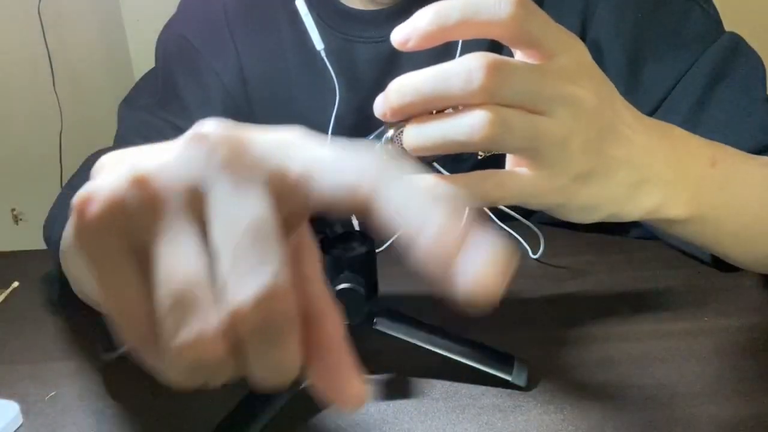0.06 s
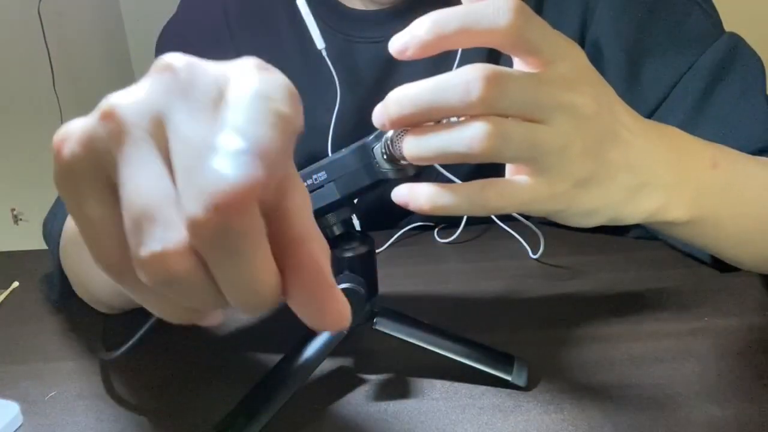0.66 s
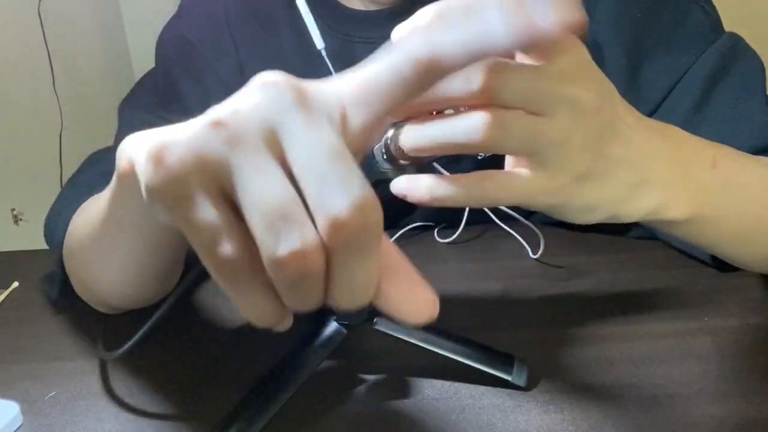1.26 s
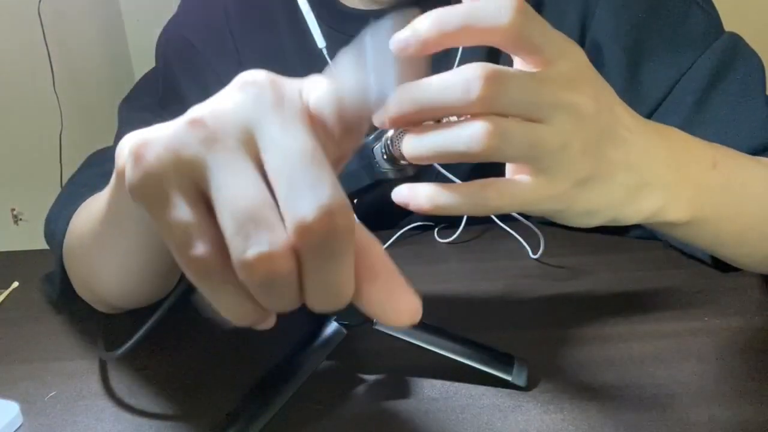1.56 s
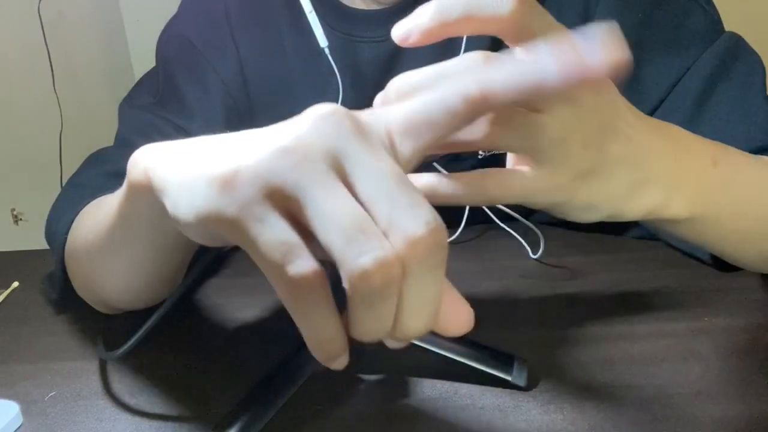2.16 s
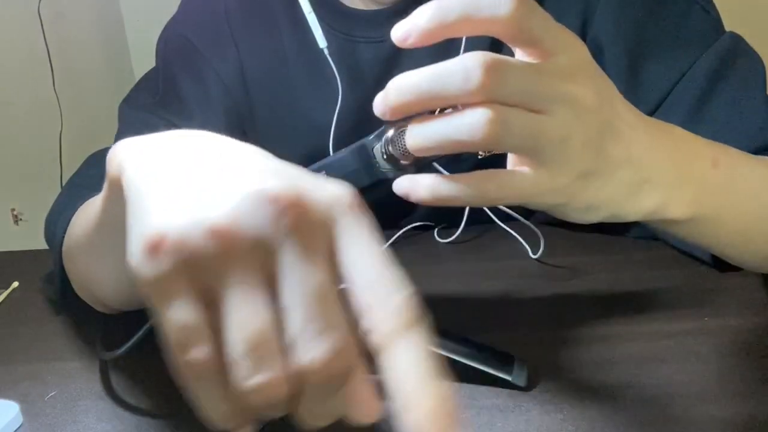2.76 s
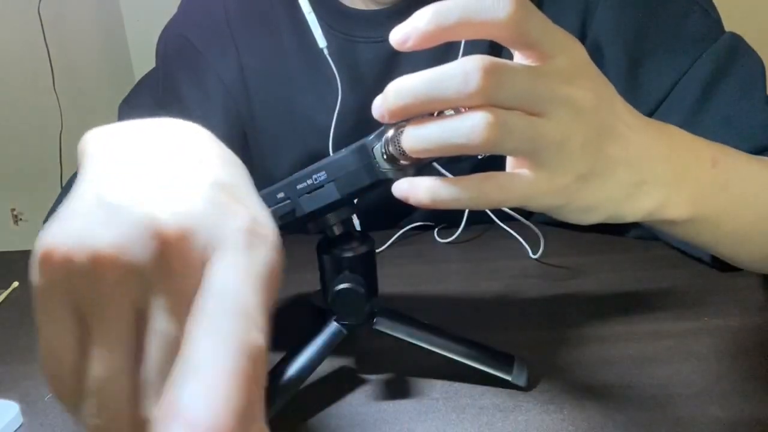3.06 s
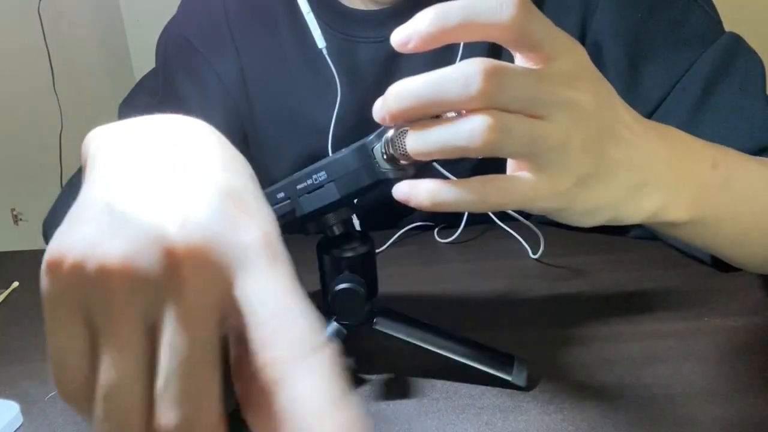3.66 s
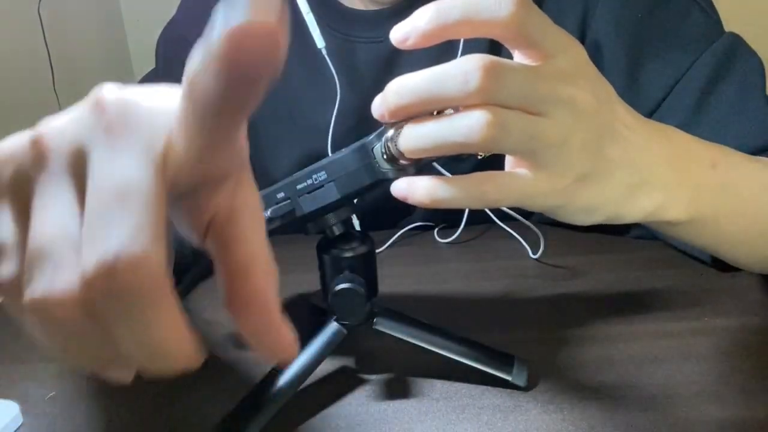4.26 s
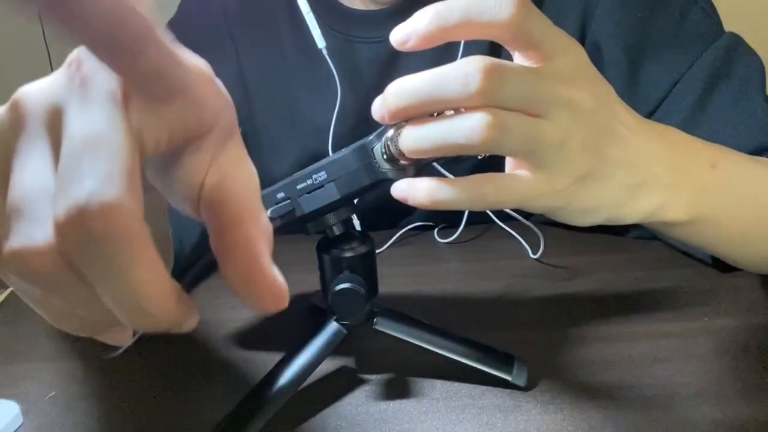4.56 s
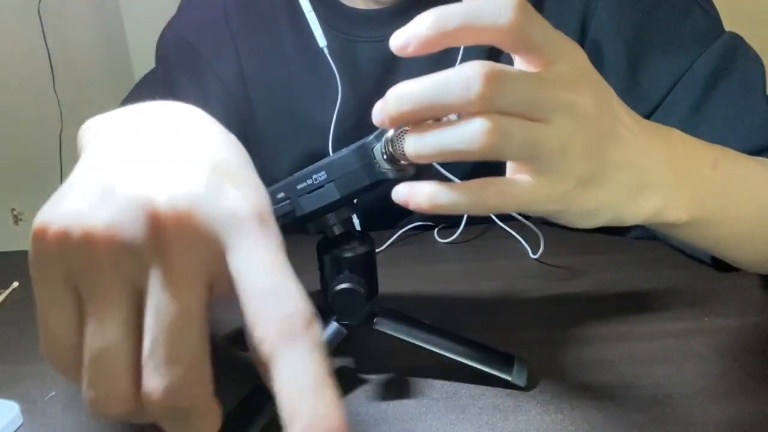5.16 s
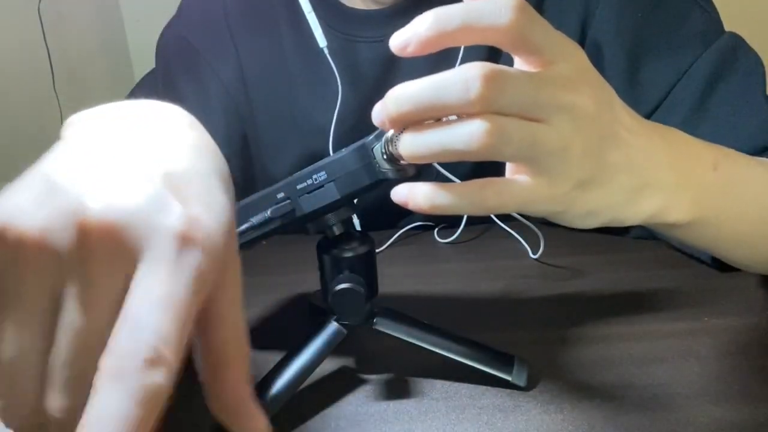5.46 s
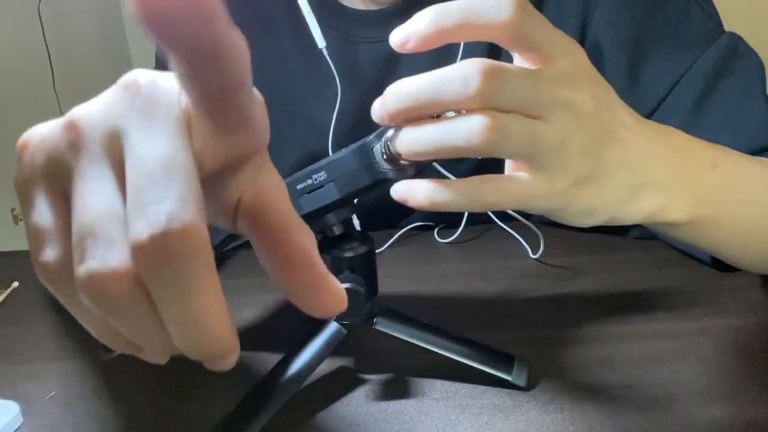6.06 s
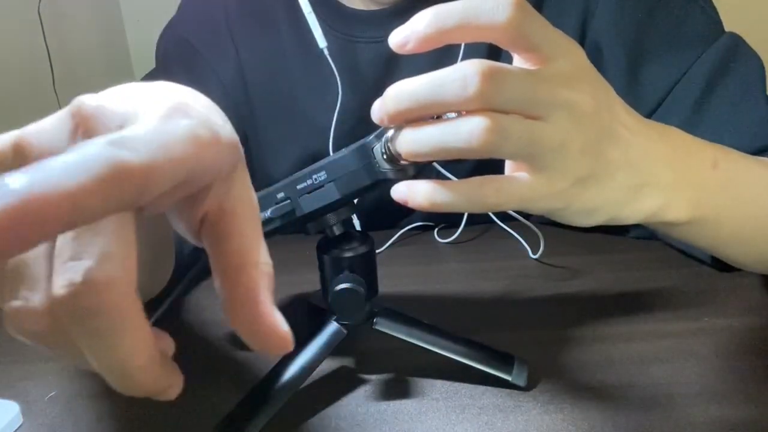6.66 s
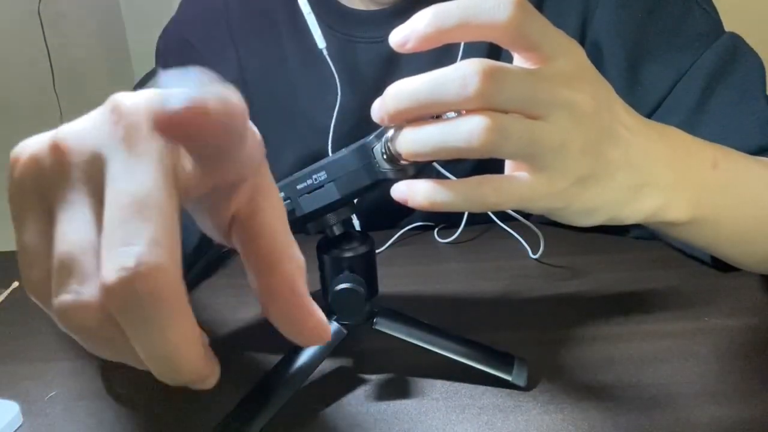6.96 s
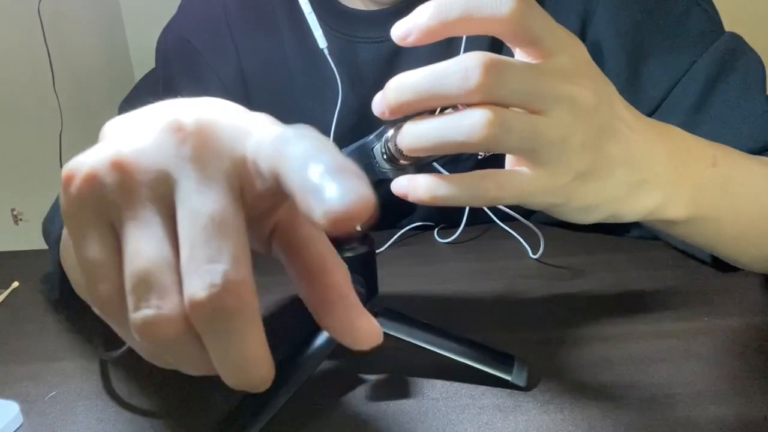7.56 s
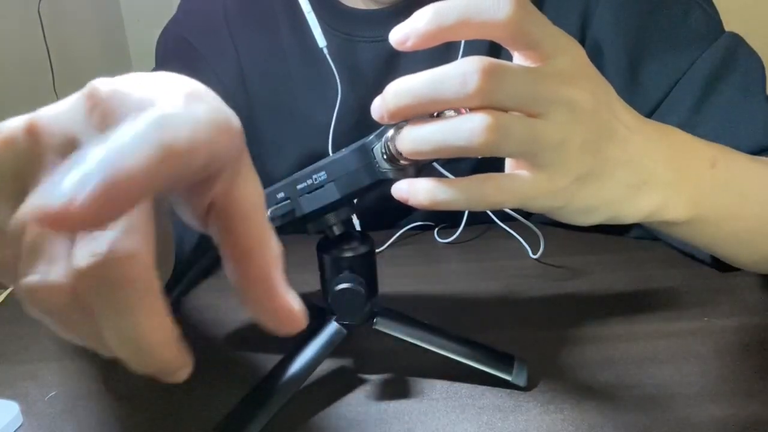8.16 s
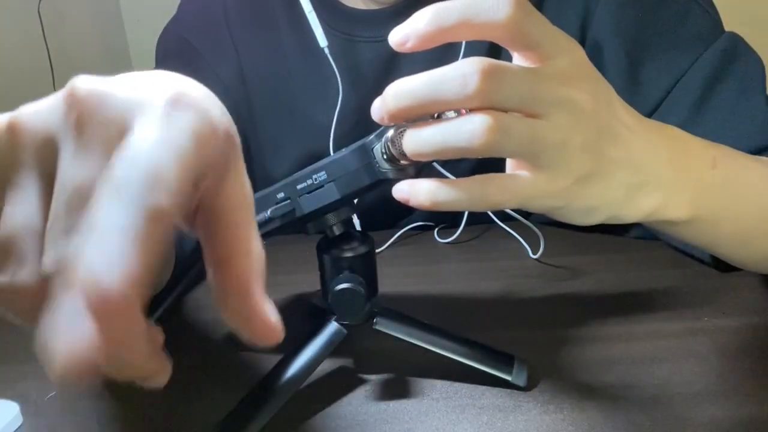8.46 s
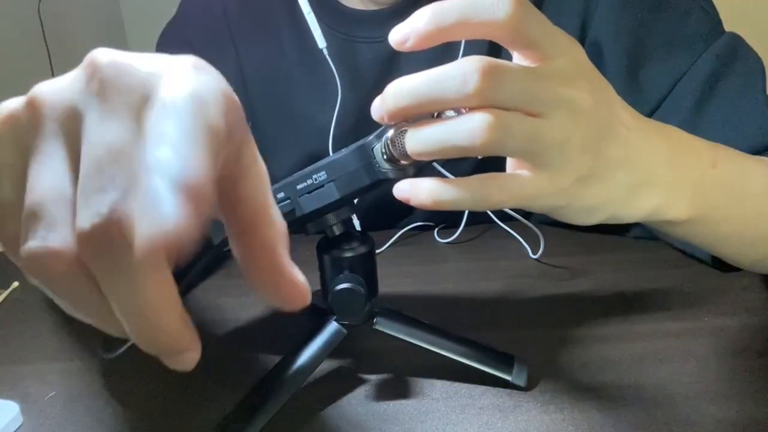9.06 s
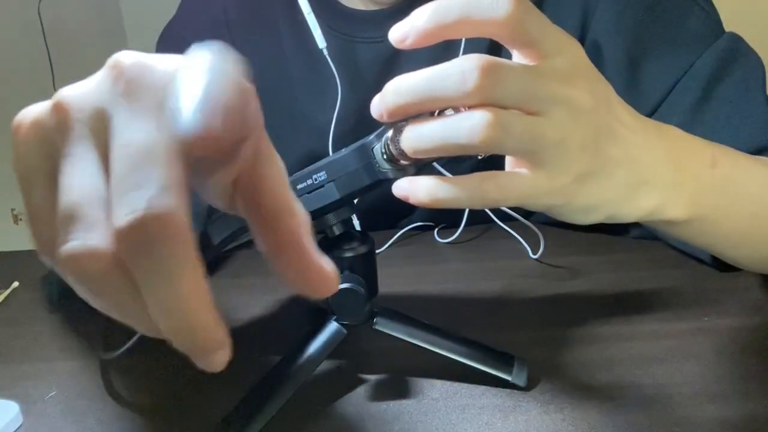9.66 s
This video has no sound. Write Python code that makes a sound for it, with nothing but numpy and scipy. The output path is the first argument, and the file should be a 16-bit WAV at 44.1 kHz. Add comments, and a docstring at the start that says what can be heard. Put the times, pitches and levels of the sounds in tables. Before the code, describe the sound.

Close, rapid scratching and flicking on a microphone's wire mesh, mostly on the right, with deep bumps in a quiet room.

```python
"""Fingertips and nails rub and flick over the mesh grille of a stereo microphone's right capsule.
Each stroke lands, slides and lifts: a stream of tiny slips rings the grille, over soft thuds of the
shoved capsule. Now and then a nail catches and lets go, or the fingers stop briefly.
The left capsule hears mostly the ringing housing, with a low thud and faint nail hiss.
The microphone sways on its stand, the room is quiet, and the hardest shove overloads the input."""
import sys
import numpy as np
from scipy import signal
from scipy.fft import rfft, irfft, next_fast_len
from scipy.io import wavfile
from scipy.ndimage import uniform_filter1d, map_coordinates

SR = 44100
rng = np.random.default_rng(int(sys.argv[2]) if len(sys.argv) > 2 else 0)


def unload_wav(signal):
    """Save mono or channel-first audio to the path in sys.argv[1] as 16-bit WAV at rate SR, clipped to [-1, 1]."""
    wavfile.write(
        sys.argv[1],
        SR,
        np.round(np.clip(np.atleast_2d(signal).T, -1, 1) * 32767).astype(np.int16),
    )


N = 432180


def amp(db):
    """Decibels to gain."""
    return 10 ** (np.asarray(db) / 20)


def unit(x):
    """Scale to rms 1."""
    return x / np.sqrt(np.mean(x ** 2) + 1e-20)


def gain(spectrum, hz):
    """Gain of (Hz, dB) points joined on a log axis."""
    points_hz, db = np.transpose(spectrum)
    return amp(np.interp(np.log(hz + 1), np.log(points_hz), db))


def wobble(rate_hz):
    """Smooth random curve, rate_hz knots a second."""
    knots = rng.standard_normal(int(N * rate_hz / SR) + 4)
    return map_coordinates(knots, [np.arange(N) * rate_hz / SR])


def filtered(x, response):
    """Apply a frequency response."""
    size = next_fast_len(N + SR // 2)
    return irfft(rfft(x, size) * response(np.fft.rfftfreq(size, 1 / SR)), size)[..., :N]


def boosted(x, boost_db, hz, width_hz):
    """Lift or damp one resonance."""
    band = filtered(x, lambda f: 1j * f * width_hz / (hz * hz - f * f + 1j * f * width_hz))
    return x + (amp(boost_db) - 1) * band


def noise(spectrum):
    """Coloured noise, rms 1."""
    return unit(filtered(rng.standard_normal(N), lambda hz: gain(spectrum, hz)))


def smoothed(envelope, span_s):
    """Moving average of a positive envelope."""
    return np.abs(uniform_filter1d(envelope, int(span_s * SR)))


def evened(x, span_s):
    """Flatten swells longer than span_s; rms 1."""
    return unit(x / np.sqrt(smoothed(x ** 2, span_s) + 0.067))


def resonator(modes, size=8192):
    """Impulse response of freely ringing modes, energy 1."""
    t = np.arange(size) / SR
    response = sum((-1) ** k * amp(db) * width * np.exp(-np.pi * width * t) * np.sin(2 * np.pi * hz * t)
                   for k, (hz, width, db) in enumerate(modes))
    response *= 1 - np.exp(-t / 0.00089)
    return response / np.linalg.norm(response)


def body(modes, spectrum, size=8192):
    """Minimum-phase impulse response of resonances on a broad spectrum, energy 1."""
    hz = np.fft.rfftfreq(size, 1 / SR)
    power = gain(spectrum, hz) ** 2
    for mode_hz, width_hz, db in modes:
        peak = amp(db) * hz * width_hz / (mode_hz ** 2 - hz ** 2 + 1j * hz * width_hz)
        skirt_loss = 1 + (2 * np.log((hz + 1) / mode_hz)) ** 4
        power += np.abs(peak) ** 2 / skirt_loss
    cepstrum = irfft(np.log(power + 1e-12) / 2)
    cepstrum[1:size // 2] *= 2
    cepstrum[size // 2 + 1:] = 0
    response = irfft(np.exp(rfft(cepstrum)))
    return response / np.linalg.norm(response)


def ring(x, response):
    """Drive an impulse response with x."""
    return signal.fftconvolve(x, response)[:N]


# Room air and capsule hiss spectra: (frequency [Hz], density [dB])
AIR_SPECTRUM = [(25, 4), (60, 1.5), (110, -3.5), (220, -0.5), (410, -7), (650, -22.5), (790, -16),
                (950, -25.5), (2000, -31.5), (6000, -44)]
HISS_SPECTRUM = [(25, 9.5), (100, 6.5), (400, 19.5), (1000, 9), (2000, 4.5), (6000, 4), (15500, 2)]
def room(air_db=-67, hiss_db=-77):
    """Faint room air common to both capsules, plus the hiss of each."""
    air = amp(air_db) * noise(AIR_SPECTRUM)
    return air + amp(hiss_db) * np.array([noise(HISS_SPECTRUM), noise(HISS_SPECTRUM)])


# Sway on the stand: (time [s], relative level [dB])
SWAY_LEVELS = [(0, -31.5), (0.6, -47), (0.9, -49), (1.8, -63), (2.15, -21), (2.5, -41.5), (2.9, -37),
               (3.5, -48), (4.9, -65), (5.35, -26.5), (5.8, -33.5), (6.5, -53.5), (7.9, -73), (8.45, -28),
               (8.8, -27.5), (9, -39), (9.8, -63)]
# Sway rumble spectrum: (frequency [Hz], density [dB])
SWAY_SPECTRUM = [(4, 7), (14, 13), (28, -0.5), (48, -10.5), (110, -39.5), (300, -99)]
def rocking(thud_db, give_s=0.065, settle_s=0.61):
    """The microphone sways slowly; the touched side also gives under each push and settles."""
    sway_db = np.interp(np.arange(N) / SR, *np.transpose(SWAY_LEVELS))
    give = amp(-4.5) * smoothed(amp(thud_db), give_s)
    settle = amp(-10) * smoothed(amp(thud_db), settle_s)
    left = amp(sway_db + 2.5) * evened(noise(SWAY_SPECTRUM), span_s=0.24)
    right = (give + settle + amp(sway_db - 9)) * evened(noise(SWAY_SPECTRUM), span_s=0.17)
    return np.array([left, right])


# Housing resonances: (frequency [Hz], width [Hz], level [dB])
HOUSING_MODES = [(592.7, 15.5, 0), (656, 40, -4), (724, 37, -15), (885, 67, -20.5), (1130, 100, -29),
                 (1480, 61, -19.5), (1534, 65, -24), (1747, 42, -25.5), (2666, 200, -32.5),
                 (4130, 140, -43)]
# Far capsule bounce spectrum: (frequency [Hz], density [dB])
FAR_THUD_SPECTRUM = [(25, -9.5), (45, 3), (70, -4), (105, -10.5), (160, -21), (250, -23), (400, -39),
                     (900, -75)]
def housing(friction, drag, knocks, carry_db, thud_db):
    """Friction and knocks ring the housing; the far capsule bounces with the finger pressure."""
    far_slips = drag * slips(rate_hz=8200, spread_db=5.5)  # these miss the near capsule
    shaking = 0.5 * friction + 0.87 * far_slips + 1.4 * knocks
    ringing = ring(amp(carry_db + 0.5) * shaking, resonator(HOUSING_MODES))
    return ringing + amp(thud_db - 20) * noise(FAR_THUD_SPECTRUM)


def push_pulse(t, push_s, edge_share):
    """One push and swing back, reversing at t = 0; a slow push also lets go slowly."""
    return -np.tanh(t / (edge_share * push_s)) * np.exp(-(t / push_s) ** 2 / 2)


# Finger pad bumps: (time [s], relative level [dB])
PAD_BUMPS = [(0.043, -25), (0.184, -27), (0.991, -37), (1.585, -38), (1.783, -44), (3.272, -37),
             (4.013, -33), (4.428, -42), (4.867, -26), (6.351, -36), (6.502, -49), (6.994, -21),
             (7.391, -14), (7.758, -15.5), (8.216, -19), (8.414, -27)]
def bumps():
    """A soft pad pushes the capsule once and lets it swing back."""
    t = np.arange(-SR // 40, SR // 40) / SR
    pulse = push_pulse(t, push_s=0.0037, edge_share=0.36)
    out = np.zeros(N)
    for time_s, db in PAD_BUMPS:
        out[round(time_s * SR) - SR // 40:][:len(t)] += amp(db + 1) * pulse
    return out


# Near capsule bounce spectrum: (frequency [Hz], density [dB])
THUD_SPECTRUM = [(25, -2), (55, 0.5), (105, -2), (150, -8), (250, -15), (400, -40), (900, -78.5)]
def capsule_thud(level_db, thumps):
    """The shoved capsule bounces on its mount. Returns the thud and the shove (rms 1)."""
    shove = evened(noise(THUD_SPECTRUM), span_s=0.025)
    bounce = amp(level_db - 0.97) * shove + thumps + bumps()
    return boosted(bounce, boost_db=0.5, hz=115, width_hz=16), shove


# Catches, relative levels: (time [s], thump [dB], scrape [dB], tick [dB], knock [dB], push [s])
NAIL_CATCHES = [(0.039, -40, -43.5, -67, -50, 0.0026), (0.341, -40, -55, -63, -38, 0.0031),
                (0.364, -29, -72, -58, -38, 0.0056), (0.406, -42, -70, -64, -52, 0.0042),
                (0.451, -26, -58, -63, -48, 0.0046), (0.501, -20.5, -73, -64, -44, 0.004),
                (0.638, -26.5, -52, -81, -60, 0.0012), (0.72, -39, -36, -57, -35, 0.0029),
                (0.785, -24, -53, -77, -51, 0.0015), (1.993, -8.5, -30, -43, -31, 0.0043),
                (2.027, -23, -33.5, -72, -53, 0.0038), (2.326, -20, -32.5, -46, -42, 0.003),
                (2.344, -24, -52, -66, -48, 0.0019), (2.375, -30, -38.5, -56, -49, 0.0024),
                (2.573, -19.5, -38, -71, -40, 0.002), (2.63, -29.5, -54, -66, -48, 0.0017),
                (3.017, -40, -50, -66, -54, 0.0043), (3.379, -21, -38, -50.5, -35, 0.0056),
                (3.534, -40, -43.5, -66, -38, 0.0034), (3.573, -13, -34, -53, -51, 0.0032),
                (3.745, -36, -36.5, -50, -26, 0.0022), (3.874, -26, -37, -65, -51, 0.0021),
                (3.935, -13, -51, -50.5, -47, 0.0033), (4.197, -19.5, -44.5, -58, -49, 0.0063),
                (4.572, -26, -31.5, -50, -41, 0.0023), (4.642, -25.5, -56, -74, -57, 0.0015),
                (4.825, -19, -42.5, -58, -38, 0.0061), (5.091, -22, -55, -48.5, -35, 0.0028),
                (5.125, -16.5, -62, -50, -34, 0.005), (5.496, -32, -60, -78, -59, 0.0028),
                (5.653, -31.5, -47, -60, -41, 0.0026), (7.031, -11.5, -30.5, -44.5, -24, 0.0016),
                (7.109, -16.5, -41, -50.5, -46, 0.0049), (7.147, -22.5, -33, -57, -33, 0.0016),
                (7.213, -40, -45, -61, -50, 0.0037), (7.361, -28, -52, -52.5, -44, 0.0053),
                (7.71, -16, -34, -49, -24, 0.0057), (7.727, -19.5, -40, -57, -20.5, 0.0019),
                (7.909, -29, -34, -50, -47, 0.0024), (7.947, -40, -42, -61, -50, 0.0046),
                (8.014, -29, -41, -58, -50, 0.019), (8.497, -18.5, -23.5, -36, -30, 0.0031),
                (8.594, -32, -41, -58, -52, 0.003), (8.616, -16, -43, -52, -23.5, 0.0046),
                (8.704, -4.5, -40, -64, -53, 0.0053), (8.9, -16, -29, -42.5, -41, 0.0014),
                (9.062, -26, -48, -64, -53, 0.0019), (9.48, -15, -35.5, -55, -44, 0.0035),
                (9.632, -18.5, -35.5, -61, -48, 0.0036)]
def catches(scrape_t60_s=0.023, tick_t60_s=0.009):
    """A catch pushes the capsule, then snaps back: a sharp slip, a short scrape, a knock on the grille."""
    lead = SR // 20
    t = np.arange(-lead, lead) / SR
    snap = 1.0 * (t == 0)

    def slide(t60_s):
        """Decaying noise after the snap."""
        return (t > 0) * amp(-60 * np.abs(t) / t60_s) * rng.standard_normal(len(t))

    out = np.zeros((4, N + SR))
    for time_s, thump_db, scrape_db, tick_db, knock_db, push_s in NAIL_CATCHES:
        thump = amp(thump_db + 5.5) * push_pulse(t, push_s, edge_share=0.25)
        scrape = amp(scrape_db + 29) * (snap + 0.085 * slide(scrape_t60_s))
        tick = amp(tick_db + 23.5) * (snap + 0.19 * slide(tick_t60_s))
        knock = amp(knock_db + 19.5) * snap
        first = round(time_s * SR)
        out[:, first:first + len(t)] += [thump, scrape, tick, knock]
    return out[:, lead:lead + N]


def slips(rate_hz, spread_db):
    """Tiny slips over the wires at random times and sizes, rms 1."""
    happens = rng.random(N) < rate_hz / SR
    sizes = amp(spread_db * np.clip(rng.standard_normal(N), -2, 2))
    return unit(happens * sizes * rng.choice([-1, 1], N))


def grip(shove, depth, flutter_db=3):
    """Friction bites harder at each shove and flutters with the ridges of the skin."""
    return unit((1 + depth * np.abs(shove)) * amp(flutter_db * wobble(rate_hz=130)))


# Wire resonances: (frequency [Hz], width [Hz], level [dB])
WIRE_MODES = [(4540, 930, -1), (5880, 170, 0)]
def singing_wires(nail_db):
    """A light touch sets the wires singing; pressure damps them, so they grow less than the hiss."""
    drive = amp(0.69 * nail_db - 36 + 3.5 * wobble(rate_hz=12))
    return ring(drive * rng.standard_normal(N), resonator(WIRE_MODES))


def tilted(x, bright_db, pivot_hz=4700):
    """Raise the treble and lower the rasp below the pivot, or the reverse."""
    treble = filtered(x, lambda hz: 1 - 1 / (1 + (hz / pivot_hz) ** 8))
    return amp(-0.35 * bright_db) * (x - treble) + amp(0.94 * bright_db) * treble


# Nail hiss and tick spectra: (frequency [Hz], density [dB])
NAIL_SPECTRUM = [(1200, -25), (2600, 7), (3600, 0.5), (5000, -0.5), (6000, -1.5), (7000, -6.5), (8500, -6),
                 (11000, -13), (15500, -14)]
TICK_SPECTRUM = [(900, -6.5), (2400, 11.5), (6000, -2.5), (15500, -27.5)]
def nail_on_wires(nail_db, waver_db, bright_db, shove, plucks, ticks):
    """The nail hisses over the wires in dense slips, sets them singing and ticks against them."""
    grain = slips(rate_hz=16000, spread_db=0.5) + 0.35 * plucks
    drive = amp(nail_db + waver_db - 1.6) * grain * grip(shove, depth=0.15)
    hiss = ring(drive, body([(5900, 350, -9)], NAIL_SPECTRUM))
    ticking = ring(ticks, body([(3260, 1700, -1)], TICK_SPECTRUM))
    return tilted(hiss, bright_db) + singing_wires(nail_db) + ticking


# Grille resonances: (frequency [Hz], width [Hz], level [dB])
GRILLE_MODES = [(638, 40, 0), (1770, 80, -13)]
# Rubbed mesh spectrum: (frequency [Hz], density [dB])
MESH_SPECTRUM = [(150, -50.5), (250, -0.5), (340, 2), (450, -2), (560, -6.5), (800, -9), (1000, -13),
                 (1400, -19.5), (2000, -24.5), (2550, -37), (3100, -37), (4200, -46.5), (9000, -83)]
def skin_on_mesh(friction, knocks, hollow_db):
    """Dragging skin and knocks ring the grille; the air inside rings with the place of the finger."""
    rasp = ring(friction, body(GRILLE_MODES, MESH_SPECTRUM))
    return boosted(rasp, hollow_db, hz=635, width_hz=130) + ring(knocks, resonator(GRILLE_MODES))


def finger_roll(rasp, depth_db=0.5, rate_hz=11):
    """The rasp shifts in colour as the finger rolls over the mesh."""
    rasp = boosted(rasp, -1.5 - depth_db * wobble(rate_hz), hz=1110, width_hz=1230)
    return boosted(rasp, -1 - depth_db * wobble(rate_hz), hz=2700, width_hz=380)


def contact(attack_s, hold_s, release_s):
    """Firmness of a stroke over 1 s, 0-1: it lands, slides, then lifts by 20 dB per release_s."""
    t = np.arange(SR) / SR
    rise = np.clip(t / attack_s, 0, 1) ** 1.42
    fall = 10 ** -np.clip((t - attack_s - hold_s) / release_s, 0, 10)
    return rise * fall


# Finger strokes, relative levels: (start [s], attack [s], hold [s], release [s], rub [dB], nail [dB],
# thud [dB], housing carry [dB], nail brightness [dB], hollowness [dB])
FINGER_STROKES = [(0.0, 0.004, 0.13, 0.087, -45.5, -62.5, -32.5, -12, 2.5, 0),
                  (0.074, 0.015, 0.014, 0.14, -40, -66, -27.5, -12, -5, -1),
                  (0.275, 0.0094, 0.017, 0.012, -51, -72, -28.5, -14.0, 2, -1),
                  (0.334, 0.0054, 0.066, 0.023, -47.0, -66.5, -25.5, -12, -2.0, -1),
                  (0.425, 0.023, 0.0031, 0.023, -41, -59.5, -26, -11, -2.0, -5.0),
                  (0.474, 0.06, 0.079, 0.09, -44, -62, -30.5, -10, -0.5, 6.5),
                  (0.658, 0.056, 0.052, 0.078, -37.5, -69, -29.5, -14.0, 9.5, 7),
                  (0.805, 0.0058, 0.063, 0.028, -43, -66.5, -30, -14, 3.0, 4.5),
                  (0.927, 0.024, 0.008, 0.15, -51.5, -71.5, -39.0, -15, 7.0, 1),
                  (1.024, 0.06, 0.019, 0.02, -31, -51, -20, -13, -1, 4.5),
                  (1.16, 0.029, 0.048, 0.033, -46, -66, -34, -15.5, -0.5, 1),
                  (1.318, 0.0052, 0.044, 0.064, -43, -62.0, -29, -21, 1.5, -4.5),
                  (1.433, 0.029, 0.044, 0.09, -51, -68, -29.5, -12, 2, 4),
                  (1.533, 0.047, 0.0068, 0.011, -48.5, -87, -26, -24, -1, -10),
                  (1.909, 0.08, 0.011, 0.015, -42.5, -68, -28, -16, -2, 1),
                  (1.985, 0.0051, 0.063, 0.038, -34, -55.5, -21.5, -16.5, 3, -1),
                  (2.099, 0.07, 0.045, 0.021, -44, -65.0, -35.5, -13.0, 3.0, 1.5),
                  (2.297, 0.057, 0.006, 0.1, -34.5, -53.0, -19, -18, -0.5, -8),
                  (2.418, 0.0083, 0.009, 0.094, -42.0, -72, -31.5, -17.0, 6, 4),
                  (2.55, 0.02, 0.01, 0.012, -33.5, -61, -21, -16, 9.5, 11),
                  (2.622, 0.01, 0.045, 0.053, -41, -60.5, -28.0, -15.0, 2.0, 1),
                  (2.723, 0.12, 0.028, 0.069, -41, -62.5, -27.5, -11.5, 3.5, 5),
                  (2.899, 0.081, 0.065, 0.084, -44, -66, -33.5, -14.0, 1, 1),
                  (3.104, 0.0078, 0.017, 0.051, -53.5, -71.0, -37, -17, 0, -7),
                  (3.335, 0.025, 0.06, 0.019, -30.0, -57, -20.5, -12, 3, 3.5),
                  (3.491, 0.032, 0.069, 0.075, -40, -60.5, -27, -13, 2.5, 2.5),
                  (3.692, 0.05, 0.014, 0.031, -33, -57.0, -27, -13.5, 3.5, 2.5),
                  (3.862, 0.0084, 0.074, 0.037, -35.5, -59.5, -25.5, -14, 4.5, 3.5),
                  (3.959, 0.0046, 0.017, 0.042, -44.5, -62.5, -26.5, -9, 4, -1),
                  (4.186, 0.0045, 0.047, 0.031, -43.5, -65, -27.5, -12, 2.5, 3.5),
                  (4.533, 0.0079, 0.033, 0.073, -34.5, -56, -20.5, -15, 0.0, -4),
                  (4.624, 0.034, 0.048, 0.054, -40, -73, -31, -14, 10, 4.5),
                  (4.707, 0.038, 0.034, 0.0083, -40, -62.0, -28.5, -15.0, 2.5, 7.5),
                  (4.816, 0.0047, 0.066, 0.031, -43, -66, -28.5, -13, 5, 6),
                  (4.94, 0.014, 0.017, 0.0053, -50.5, -77, -47, -12, 1, -5),
                  (5.07, 0.024, 0.078, 0.025, -33, -58, -24, -14, 6, -2.5),
                  (5.216, 0.067, 0.057, 0.011, -40, -59, -26, -9.5, -1, 1),
                  (5.431, 0.016, 0.012, 0.056, -45.5, -62, -28.5, -13, -3, -3.0),
                  (5.641, 0.018, 0.023, 0.026, -39.5, -58.5, -26, -9, 2.0, -1.0),
                  (7.021, 0.015, 0.011, 0.14, -27.5, -53.5, -17.5, -13.5, 0.5, 2.0),
                  (7.072, 0.039, 0.047, 0.031, -32.5, -60.5, -22, -16, 6.5, 8.5),
                  (7.207, 0.0062, 0.0039, 0.032, -38.5, -61, -44, -14, 3.5, -2),
                  (7.283, 0.08, 0.027, 0.057, -36, -59.0, -24, -12.0, 0.5, 1.5),
                  (7.585, 0.028, 0.0041, 0.039, -57.0, -76.0, -33.5, -16.0, -2, -12),
                  (7.681, 0.033, 0.03, 0.03, -21.5, -45.5, -13, -14, 0.5, 1.5),
                  (7.848, 0.057, 0.0073, 0.024, -26, -49.5, -13.5, -20, 0.5, -2.5),
                  (7.916, 0.024, 0.076, 0.046, -41.5, -63.0, -31.5, -15, 0.5, 0),
                  (8.21, 0.043, 0.02, 0.028, -28, -52.5, -18, -14, 1.5, 2),
                  (8.314, 0.018, 0.024, 0.015, -52, -76, -43, -13, 6, 3),
                  (8.425, 0.013, 0.049, 0.028, -32, -53.5, -17, -14.5, 0, -4.5),
                  (8.531, 0.06, 0.027, 0.022, -35.5, -55.5, -20.0, -10.5, -8, 4),
                  (8.674, 0.016, 0.015, 0.029, -26.5, -53.5, -8, -15.5, -11.5, -4),
                  (8.795, 0.011, 0.114, 0.015, -41.5, -60, -26.5, -15, -0.5, 0.0),
                  (8.887, 0.012, 0.012, 0.052, -26.5, -60.5, -19.5, -16, 6, -1),
                  (8.964, 0.065, 0.039, 0.119, -41, -60.0, -26.5, -13, 4.5, 3.5),
                  (9.108, 0.029, 0.049, 0.022, -42.5, -63.5, -29.5, -13.0, 2, 6.5),
                  (9.427, 0.015, 0.071, 0.0058, -39, -57.0, -23.5, -15, 2, 2.5),
                  (9.594, 0.038, 0.0064, 0.05, -34.5, -53.5, -21.0, -18, 0.0, -3),
                  (9.689, 0.022, 0.044, 0.069, -55.5, -75, -35, -16, -3, -8)]
def strokes(rest_db=-92, linger_s=0.013):
    """Level and colour curves in dB: strokes add in power, and the hardest rub sets the colour."""
    power = np.full((3, N), amp(2 * rest_db))
    colour = np.zeros((3, N))
    for start_s, attack_s, hold_s, release_s, rub_db, nail_db, thud_db, *colour_db in FINGER_STROKES:
        first = round(start_s * SR)
        touch = contact(attack_s, hold_s, release_s)[:N - first]
        pressure = contact(attack_s, hold_s, release_s + linger_s)[:N - first]
        levels = np.array([amp(rub_db) * touch, amp(nail_db) * touch ** 0.9, amp(thud_db) * pressure])
        power[:, first:first + SR] += levels ** 2
        colour[:, first:first + SR] += np.outer(colour_db, levels[0] ** 2)
    return 10 * np.log10(power), colour / power[0]


def landings(brisk_s=0.0059):
    """The nail ticks as it meets the mesh; landings slower than brisk_s tick less."""
    out = np.zeros(N)
    for start_s, attack_s, _, _, _, nail_db, *_ in FINGER_STROKES:
        out[round((start_s + attack_s / 2) * SR)] += amp(nail_db + 16.5) * min(brisk_s / attack_s, 1)
    return out


def fingers():
    """Strokes and catches on the right; housing ring, low thud and faint nail hiss on the left."""
    (rub_db, nail_db, thud_db), (carry_db, bright_db, hollow_db) = strokes()
    thumps, scrapes, ticks, knocks = catches()
    waver_db = wobble(rate_hz=55)  # unsteady finger pressure
    thud, shove = capsule_thud(thud_db + waver_db, thumps)
    plucks = slips(rate_hz=130, spread_db=4)  # single wires
    drag = amp(rub_db + waver_db - 0.5) * grip(shove, depth=0.49)
    friction = drag * (0.91 * slips(rate_hz=6000, spread_db=2) + 0.33 * plucks) + scrapes
    skin = skin_on_mesh(friction, knocks, hollow_db)
    nail = nail_on_wires(nail_db, waver_db, bright_db, shove, plucks, ticks + landings())
    left = housing(friction, drag, knocks, carry_db, thud_db) + amp(-25.5) * nail + amp(-35.5) * thud
    right = thud + finger_roll(skin + nail)
    return np.array([left, right]) + rocking(thud_db)


def scene():
    """Fingers and room, left and right."""
    return fingers() + room()


def record(dry):
    """The input clips at full scale and keeps nothing above its band limit."""
    return filtered(np.clip(dry, -1, 1), lambda hz: hz < 15830)


dry = scene()
out = record(dry)
unload_wav(out)
```